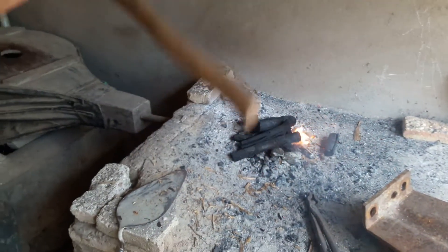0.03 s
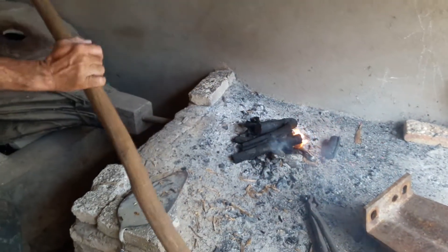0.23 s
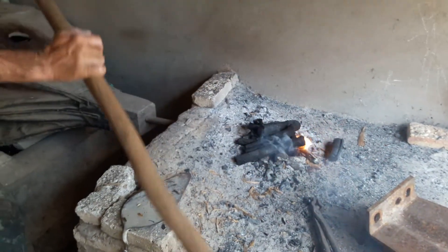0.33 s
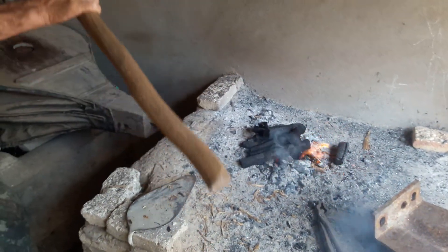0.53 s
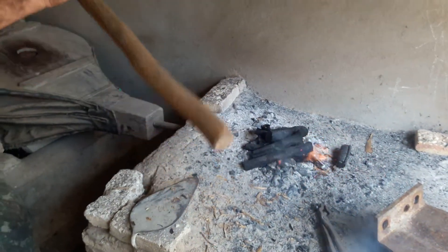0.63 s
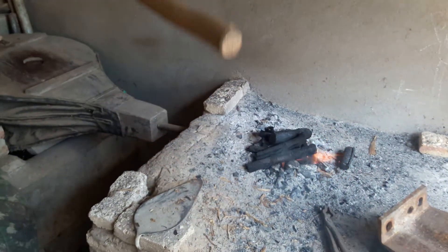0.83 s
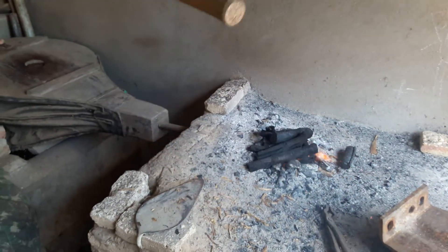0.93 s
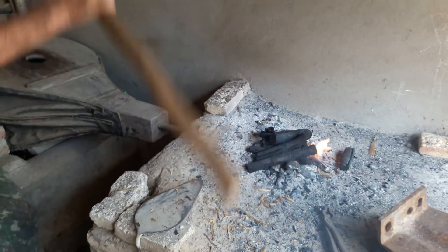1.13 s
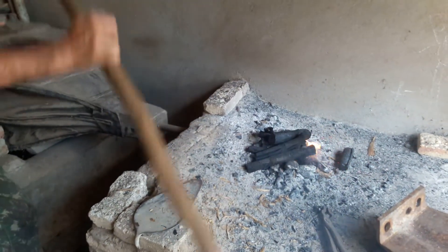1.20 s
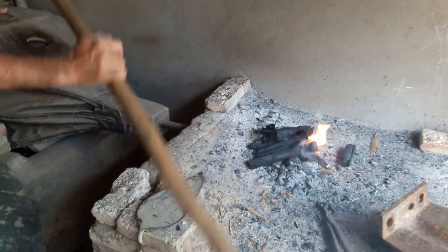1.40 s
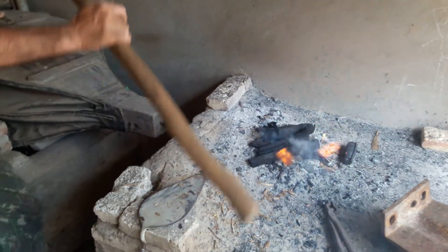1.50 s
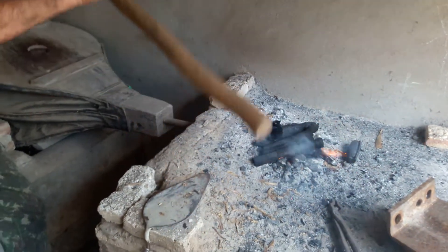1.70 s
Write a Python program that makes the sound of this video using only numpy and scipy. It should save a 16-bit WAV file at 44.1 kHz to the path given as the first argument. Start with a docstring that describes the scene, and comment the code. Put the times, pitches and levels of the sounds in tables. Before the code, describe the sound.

A leather bellows pumps air into a charcoal forge, close by in a small workshop. At about 0.2 seconds a push hisses through the coals and the flame gives a low, throbbing roar. The wooden lever knocks lightly near 0.5, and air rushes hollowly back in until 1.1. A second blast comes at 1.2, then a knock and another intake at 1.5. Charcoal snaps throughout with a short echo.

```python
"""In a small workshop, a leather bellows worked by a wooden lever blows a charcoal forge.
Each push sends air hissing through the coals and makes the flame roar and flare.
The lever knocks as it turns, and the bag draws air back in with a hollow rush.
Charcoal snaps now and then, and the bare walls answer with a short echo."""
import sys
import numpy as np
from scipy import signal
from scipy.fft import rfft, irfft
from scipy.io import wavfile
from scipy.ndimage import uniform_filter1d

SR = 44100
rng = np.random.default_rng(int(sys.argv[2]) if len(sys.argv) > 2 else 0)


def unload_audio(sound):
    """Save the sound as a 16-bit wav file, at the path given as the first command line argument."""
    columns = np.transpose(np.atleast_2d(sound))
    # keep every value between -1 and 1, then stretch to whole-number steps
    steps = np.round(np.clip(columns, -1, 1) * 32767)
    wavfile.write(sys.argv[1], SR, steps.astype(np.int16))


N = 77175  # 1.75 seconds


def undb(db):
    """Turn decibels into a number to multiply by."""
    return 10 ** (np.asarray(db) / 20)


def unit(x):
    """Scale a sound to an average strength (rms) of 1."""
    return x / np.sqrt(np.mean(x ** 2))


def gains(tone, hz):
    """How strong each frequency is, read from a table of (frequency [Hz], level [dB])."""
    freqs, levels = np.array(tone, float).T
    return undb(np.interp(np.log(hz + 1), np.log(freqs), levels))


def noise(gain):
    """Noise of strength 1, with its lows and highs shaped by gain(frequency)."""
    white = rfft(rng.standard_normal(N))
    return unit(irfft(white * gain(np.fft.rfftfreq(N, 1 / SR)), N))


def resonance(f, hz, width):
    """A peak that lets through only the frequencies near hz."""
    return 1 / (1 + ((f * f - hz * hz) / (width * f + 1)) ** 2 / 2)


def wobble(hz):
    """A smooth random wiggle; a higher hz makes it quicker."""
    return noise(lambda f: np.exp(-(f / hz) ** 2))


def steady(x, seconds):
    """Even out the slow swells of a noise."""
    return x / np.sqrt(uniform_filter1d(x * x, int(seconds * SR)) + 1e-9)


def ramp(t, seconds):
    """Climb from 0 to 1, starting at time 0."""
    return np.clip(t / seconds, 0, 1)


def bump(t, peak_s, width_s):
    """Swell smoothly to 1 and sink back."""
    return np.exp(-((t - peak_s) / width_s) ** 2)


def ring(t, seconds):
    """Start at time 0 and fade by 60 dB in the given time."""
    return (t >= 0) * np.exp(-np.log(1000) * np.maximum(t, 0) / seconds)


def stroke(t, start, end, rise_s, fall_s):
    """Air flow of one stroke of the bellows: it rises, holds, then tapers off."""
    taper = np.exp(-(np.maximum(t - end, 0) / fall_s) ** 1.7)
    return np.sin(np.pi / 2 * ramp(t - start, rise_s)) * taper


def colour(x, tone, brightness):
    """Give a sound the tone of a table, tilted by brightness [dB per octave]."""
    f = np.fft.rfftfreq(1024, 1 / SR)
    curve = gains(tone, f) * undb(brightness * np.log2((f + 200) / 5000))
    # build the filter so that it rings only after a click, never before it
    cepstrum = irfft(np.log(curve))
    one_sided = np.r_[cepstrum[0], 2 * cepstrum[1:512], np.zeros(512)]
    return signal.fftconvolve(x, irfft(np.exp(rfft(one_sided))))[:N]


def room(x, t):
    """The hearth and walls send back a crowd of quick echoes, then a faint tail."""
    fade = ring(t, 0.093) + undb(-7.5) * ring(t, 0.18)
    echoes = rng.standard_normal(N) * fade * ramp(t, 0.0046)
    return signal.fftconvolve(x, echoes / np.sqrt(np.sum(echoes ** 2)))[:N]


# Tone of the quiet background (frequency [Hz], relative level [dB])
AIR_TONE = [(25, -16), (80, -8), (250, -11.5), (500, -14.5), (1500, -15), (3000, -24), (9000, -27),
            (16000, -30)]

def workshop_air():
    """A faint, even hush fills the workshop."""
    return undb(-55.5) * noise(lambda f: gains(AIR_TONE, f))


# Tone of cracking charcoal (frequency [Hz], relative level [dB])
SNAP_TONE = [(200, -11), (700, 8.5), (1600, 5.5), (2900, 0.5), (4700, 9), (5400, 4), (6300, 7), (8500, 5),
             (12000, 4.5), (16000, -6.5)]
# Snaps (time [s], relative level [dB], brightness [dB per octave], echo [dB], chip pitch [Hz])
SNAPS = [(0.003, -29, 0.5, 10.5, 4960), (0.1409, -35.5, 0, 14.5, 4860), (0.2788, -29, -0.5, 7, 8200),
         (0.341, -14, -.5, 5.5, 6180), (0.45, -43, -1, 12, 7440), (0.5292, -28, 3.5, 4, 7250),
         (0.589, -18.5, 2.1, 8, 5000), (0.8176, -35.5, -1, 12, 5800), (1.0805, -41.5, 6.5, 8, 8500),
         (1.3981, -20.5, -1, 2.5, 4700), (1.498, -42, -6, -3, 7500)]
TICKS_PER_S, HEARTH_ECHO_S = 40, 0.0012

def charcoal(t):
    """Charcoal snaps over a faint crackle, and the sound bounces off the hearth and walls."""
    ticks = rng.random(N) < TICKS_PER_S / SR
    ticks = ticks * undb(-48 + 2 * np.minimum(rng.exponential(size=N), 3))
    out = colour(ticks + undb(-6) * room(ticks, t), SNAP_TONE, brightness=2.2)
    for at, db, brightness, echo_db, chip_hz in SNAPS:
        age = t - at
        crack = -1.0 * (np.arange(N) == int(at * SR))
        splinters = undb(-16) * (age >= 0) * np.exp(-np.abs(age) / 0.003) * rng.standard_normal(N)
        chip = undb(-14) * ring(age, 0.0054) * np.sin(2 * np.pi * chip_hz * age)
        hearth = undb(2) * np.roll(crack, int(HEARTH_ECHO_S * SR))
        walls = undb(echo_db) * room(crack, t)
        out += undb(db) * colour(crack + splinters + chip + hearth + walls, SNAP_TONE, brightness)
    return out


# Notes the wooden lever rings with (pitch [Hz], ring time [s], relative level [dB])
WOOD_NOTES = [(820, .025, -9), (954, 0.02, -4.5), (1370, 0.018, -24), (1608, 0.044, 6), (1720, 0.015, -4),
              (1844, 0.019, 4), (2460, 0.018, -21), (2960, 0.0077, -16)]
# Knocks of the lever
# (time [s], relative level [dB], bounce delay [s], bounce vs. knock [dB], brightness [dB per octave])
KNOCKS = [(0.4798, -38, 0.002956, 10, 12), (1.5226, -26.5, 0.002247, -3, -3)]
THUD_HZ, RUSTLE_HZ = (95, 145), 8300

def lever(t):
    """The wood knocks and bounces at the turn; the bag jolts with a thud and its leather rustles."""
    wood, bag = 0, 0
    for at, db, bounce_s, bounce_db, brightness in KNOCKS:
        for hit_at, hit_db in ((at, db), (at + bounce_s, db + bounce_db)):
            age = t - hit_at
            notes = 0
            for hz, ring_s, note_db in WOOD_NOTES:
                pitch = hz * (1 + 0.018 * rng.standard_normal())  # no two hits are quite alike
                level = undb(note_db + brightness * np.log2(hz / 1600))
                notes += level * ring(age, ring_s) * np.sin(2 * np.pi * pitch * age)
            grit = np.exp(-np.abs(age) / 0.0038) * noise(lambda f: resonance(f, hz=1240, width=960))
            wood += undb(hit_db) * ramp(age, 0.0003) * (notes / 2 + undb(-5.5) * grit)
        age = t - at
        thud = ring(age, 0.096) * ramp(age, 0.0097) * sum(np.sin(2 * np.pi * hz * age) for hz in THUD_HZ)
        unfolding = undb(-52.5 + 3 * wobble(200)) * bump(age, peak_s=0.031, width_s=0.027)
        rustle = unfolding * noise(lambda f: resonance(f, RUSTLE_HZ, width=3700))
        bag += undb(-26.5) * thud + rustle
    return wood + undb(-8.5) * room(wood, t) + bag


# Tone of the air rushing in (frequency [Hz], relative level [dB])
RUSH_TONE = [(35, -76), (60, -86), (94, -12), (172, -6.5), (217, -1), (250, -3.5), (323, -10.5),
             (417, -3.5), (480, -12), (553, -11.5), (732, 2), (991, -10), (1510, -12.5), (1620, -12.5),
             (2050, -12), (3190, -24), (8510, -25.5), (13000, -31.5), (16000, -60)]
# Hollow notes of the bag and its inlet (pitch [Hz], width about 10 dB down [Hz], relative level [dB])
BAG_NOTES = [(177.3, 66, -2.5), (251, 22, 1), (417.5, 23, -10.5), (565.2, 65, -3.5), (654, 28, -6.5),
             (703, 22, -8.5), (770.8, 14, -8.5), (961, 63, -10.5), (1487, 130, -5), (1870, 130, -11)]
# Times when the bag refills (start [s], start of fade [s], relative level [dB])
REFILLS = [(-0.45, -0.008, -42.5), (0.471, 1.089, -39.5), (1.521, 2.1, -40)]
SWELL_DB, TUG_DB, TUG_BELOW_HZ = 3.5, 10.5, 500

def refill(t):
    """Air rushes in and rings the hollow bag; the first tug brings out its lowest notes."""
    flow, tug = 0, 0
    for start, end, db in REFILLS:
        # the lever moves fastest late in the stroke
        swell_db = SWELL_DB * bump(t - start, peak_s=0.46, width_s=0.1)
        flow += undb(db + swell_db) * stroke(t, start, end, rise_s=0.041, fall_s=0.091)
        tug += bump(t - start, peak_s=0.088, width_s=0.038)
    rush = noise(lambda f: gains(RUSH_TONE, f))
    bag = 0
    for hz, width, db in BAG_NOTES:
        hollow = steady(noise(lambda f: resonance(f, hz, width / 2)), 0.18)
        bag += undb(db + TUG_DB * tug * min(TUG_BELOW_HZ / hz, 1)) * hollow
    flutter = undb(1.5 * wobble(33))
    return flow * flutter * (undb(-2.5) * rush + undb(-10) * bag)


# Tone of the flame's roar (frequency [Hz], relative level [dB])
ROAR_TONE = [(25, -47), (50, -25), (80, -4), (110, -2.5), (150, -3.5), (215, -0.5), (280, -9.5),
             (400, -22.5), (700, -49), (2000, -63)]
# How loud the roar is as time passes (time [s], level [dB])
ROAR_LEVELS = [(0, -76), (0.13, -60), (0.19, -46), (0.23, -37), (0.27, -35.5), (0.34, -42.5), (0.38, -47.5),
               (0.41, -58.5), (0.455, -49.5), (0.6, -53.5), (1.22, -56), (1.29, -43.5), (1.34, -38),
               (1.38, -30), (1.42, -37.5), (1.455, -45.5), (1.5, -51.5), (1.75, -50.5)]
# Brief throbs of the flame (peak time [s], pitch [Hz], level [dB], swell [s], fade [s])
FLARES = [(0.227, 90.8, -37, 0.014, 0.0088), (0.287, 170, -27, 0.0052, 0.015),
          (0.32, 163, -19, 0.026, 0.016), (0.326, 102.2, -30, 0.015, 0.013),
          (0.411, 97.6, -37, 0.015, 0.014), (1.335, 219, -39, 0.04, 0.022),
          (1.377, 95, -27.5, 0.014, 0.011), (1.379, 150.8, -23.5, .011, .012),
          (1.412, 137.2, -34, .006, 0.017)]
FLARE_SAG_PER_S = 0.7

def flame(t):
    """The swirling flame gives a low roar, and each flare throbs with a slightly sinking pitch."""
    roar = steady(noise(lambda f: gains(ROAR_TONE, f)), 0.031)
    out = undb(np.interp(t, *np.array(ROAR_LEVELS).T)) * roar
    for at, hz, db, swell_s, fade_s in FLARES:
        age = t - at
        pitch = hz * np.exp(-FLARE_SAG_PER_S * age) * (1 + 0.02 * wobble(44))
        throb = unit(np.sin(2 * np.pi * np.cumsum(pitch) / SR))
        shape = np.exp(-np.abs(age / np.where(age < 0, swell_s, fade_s)) ** 1.2)
        out += undb(db + 1.6 * wobble(49)) * shape * throb
    return out


# Tone of air hissing through the coals (frequency [Hz], relative level [dB])
HISS_TONE = [(260, -38), (450, -2.5), (485, -40), (546, -9.5), (936, -7), (1980, -1.5), (2510, -11),
             (4230, -7.5), (5380, -14), (8420, -7.5), (16000, -25)]
# Pushes of the bellows (start [s], start of fade [s], level [dB])
PUSHES = [(0.192, 0.346, -43.5), (1.228, 1.372, -43.5)]
WHISTLE_HZ, WHISTLE_SAG_PER_S, TREBLE_HZ = 4200, 0.64, 6000
KICK_SHARE = 0.21  # the part of the flow that starts at once as the valve opens

def blast(t):
    """The jet of air whistles faintly at the nozzle, then hisses through the coals."""
    out = 0
    for start, end, db in PUSHES:
        age = np.maximum(t - start, 0)
        pitch = WHISTLE_HZ * np.exp(-WHISTLE_SAG_PER_S * age)
        breathy_note = unit(wobble(310) * np.sin(2 * np.pi * np.cumsum(pitch) / SR))
        whistle = undb(-13) * ramp(age, 0.008) * bump(age, peak_s=0, width_s=0.084) * breathy_note
        flutter = undb(wobble(52))
        hiss = flutter * noise(lambda f: gains(HISS_TONE, f) * f / (f + 150))
        body = signal.sosfiltfilt(signal.butter(2, TREBLE_HZ, fs=SR, output="sos"), hiss)
        treble = (hiss - body) * undb(-10 * ramp(age - 0.14, 0.043))  # eases as the pressure falls
        build_up = (1 - KICK_SHARE) * stroke(t, start, end, rise_s=0.1, fall_s=0.046)
        kick = KICK_SHARE * stroke(t, start, end, rise_s=0.0037, fall_s=0.046)
        out += undb(db) * ((build_up + kick) * (body + treble) + whistle)
    return out


def scene():
    """Add the quiet workshop, the bellows and the fire together in one channel."""
    t = np.arange(N) / SR
    return (workshop_air() + blast(t) + flame(t) + refill(t) + lever(t) + charcoal(t))[None]


def record(dry):
    """Trim the deepest bass (below 53 Hz) and the highest treble (above 16000 Hz)."""
    dry = signal.sosfilt(signal.butter(2, 53, "high", fs=SR, output="sos"), dry)
    return signal.sosfilt(signal.ellip(8, 0.2, 70, 16000, fs=SR, output="sos"), dry)


dry = scene()
out = record(dry)
unload_audio(out)
```